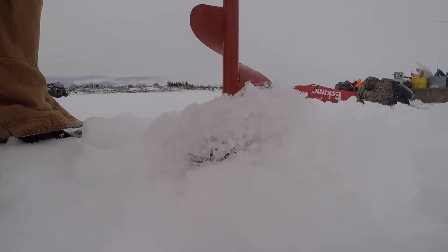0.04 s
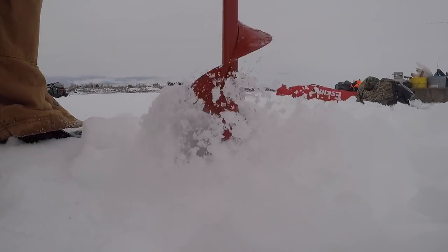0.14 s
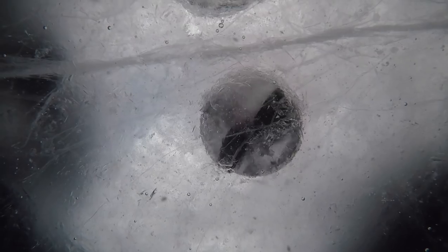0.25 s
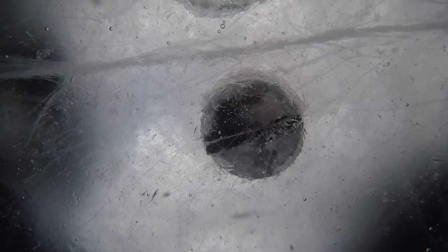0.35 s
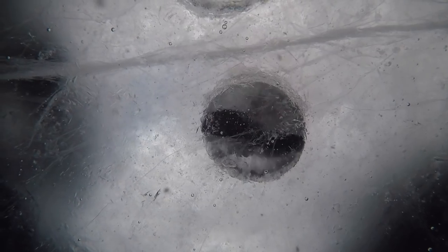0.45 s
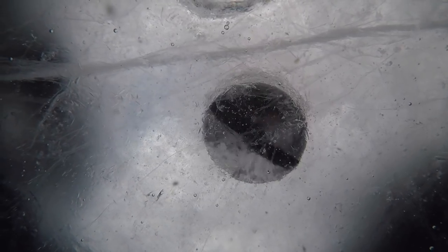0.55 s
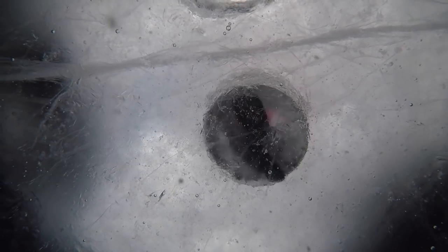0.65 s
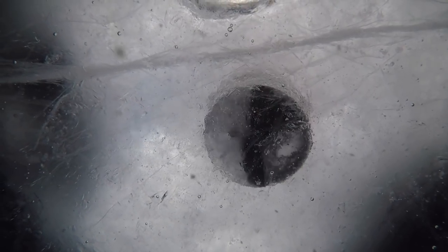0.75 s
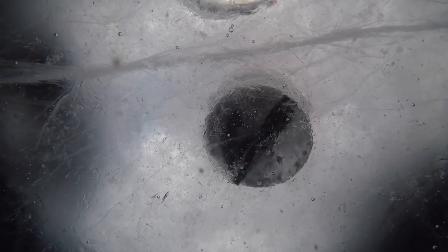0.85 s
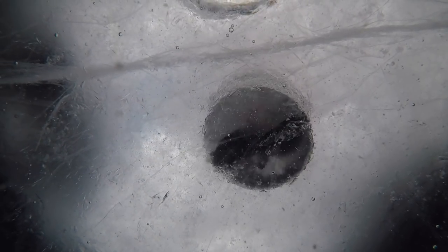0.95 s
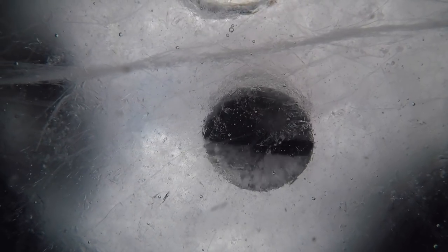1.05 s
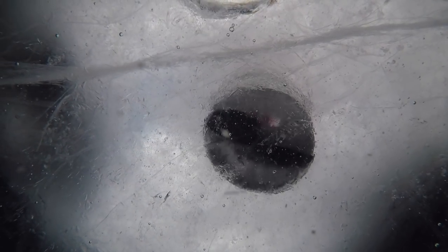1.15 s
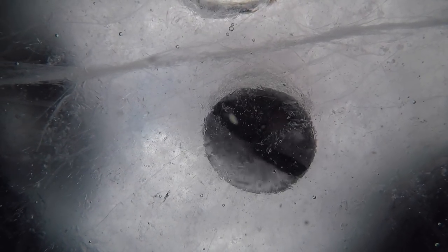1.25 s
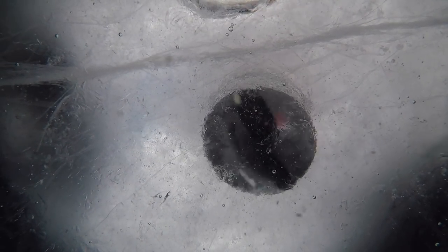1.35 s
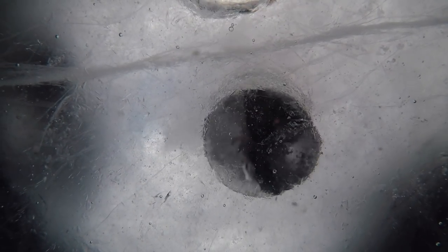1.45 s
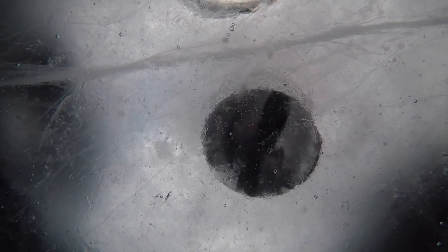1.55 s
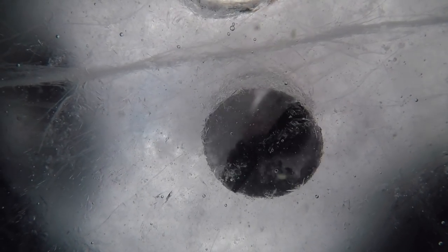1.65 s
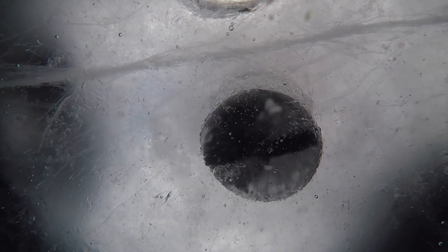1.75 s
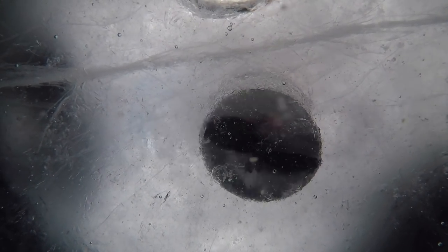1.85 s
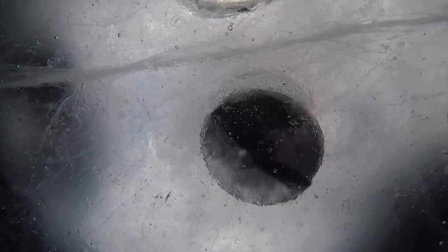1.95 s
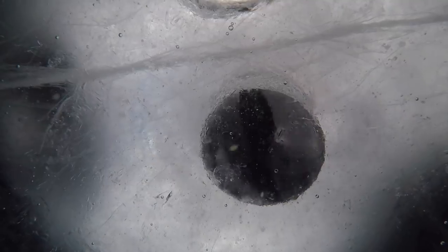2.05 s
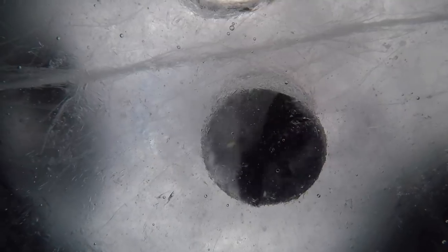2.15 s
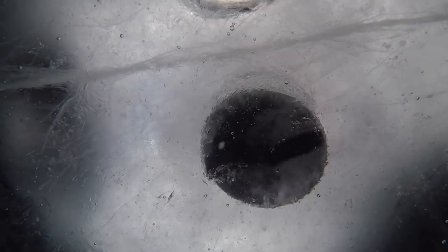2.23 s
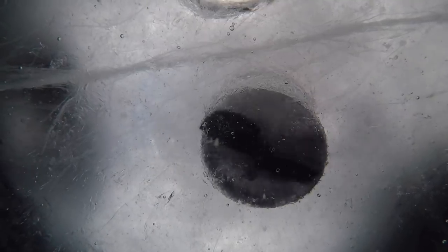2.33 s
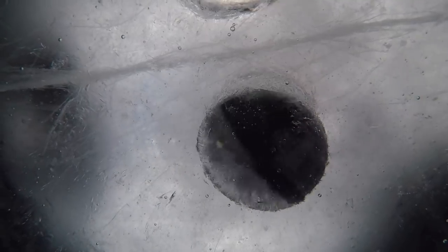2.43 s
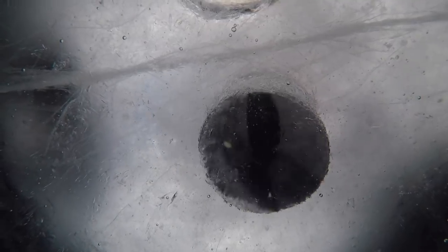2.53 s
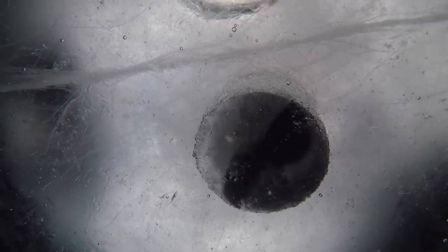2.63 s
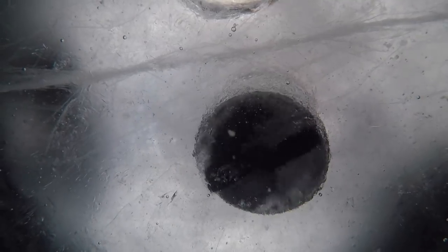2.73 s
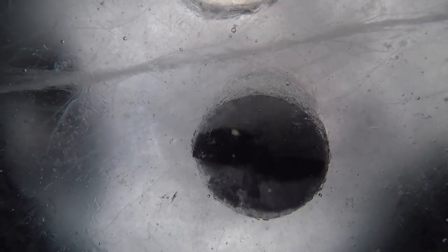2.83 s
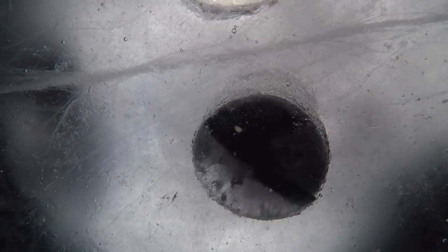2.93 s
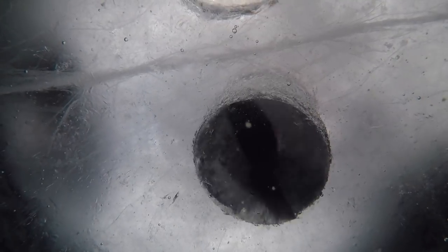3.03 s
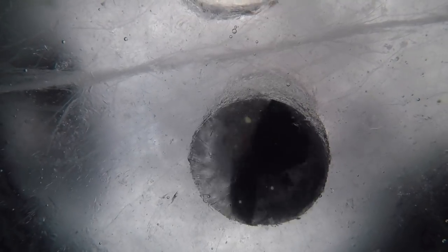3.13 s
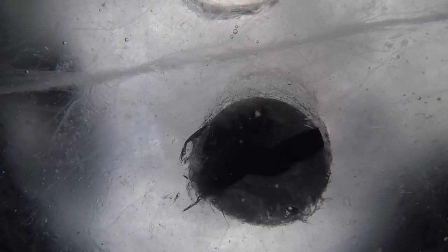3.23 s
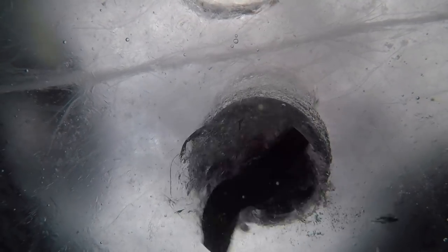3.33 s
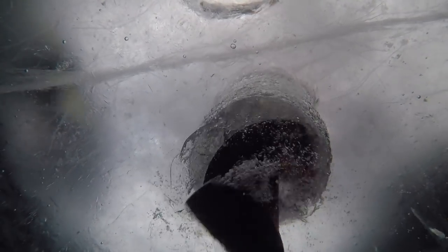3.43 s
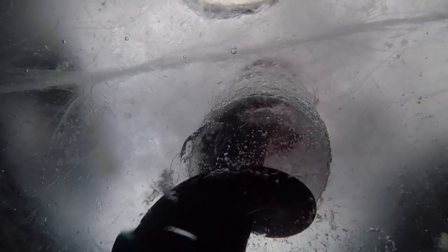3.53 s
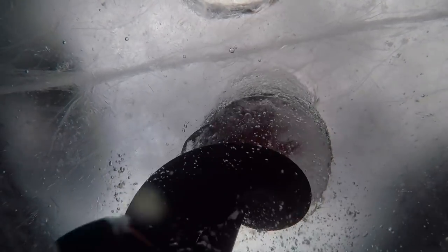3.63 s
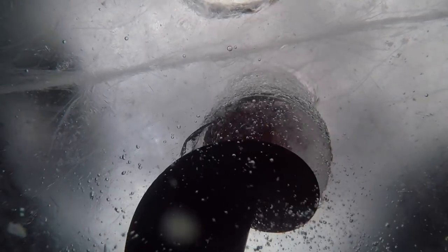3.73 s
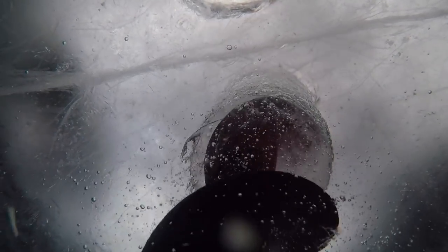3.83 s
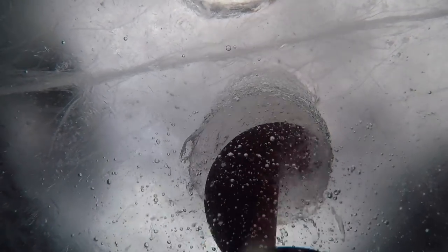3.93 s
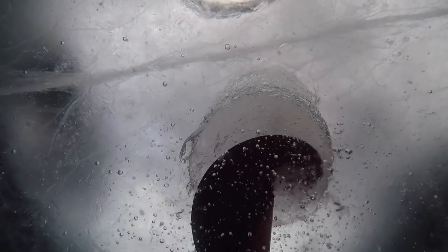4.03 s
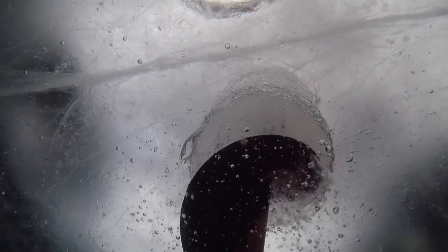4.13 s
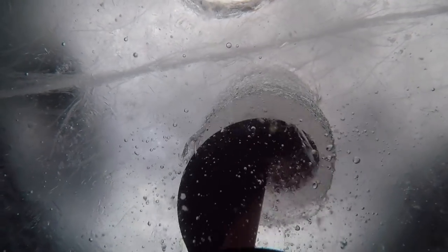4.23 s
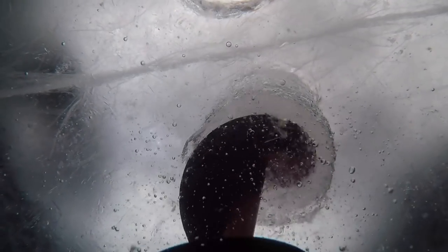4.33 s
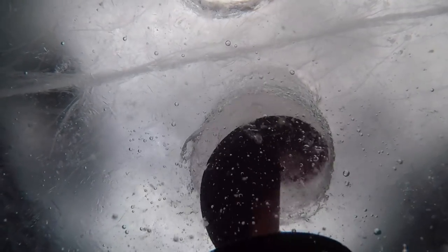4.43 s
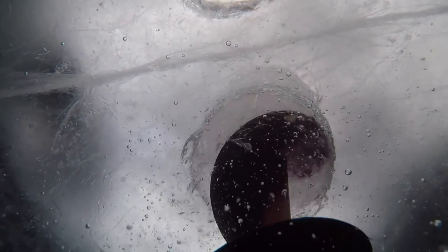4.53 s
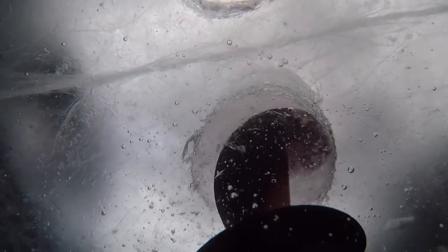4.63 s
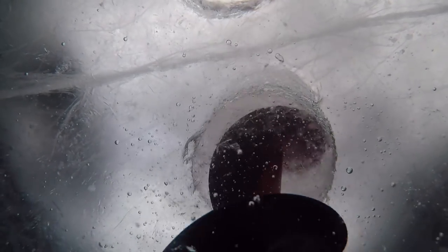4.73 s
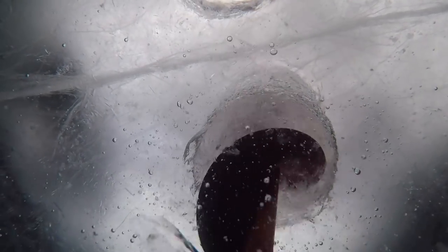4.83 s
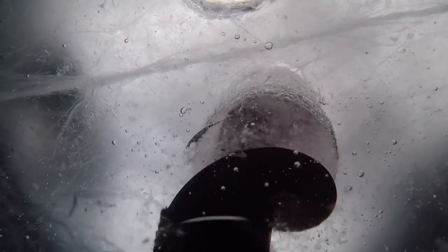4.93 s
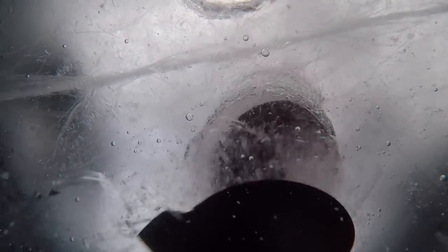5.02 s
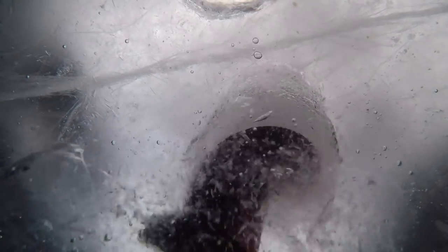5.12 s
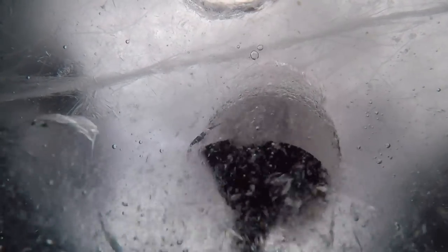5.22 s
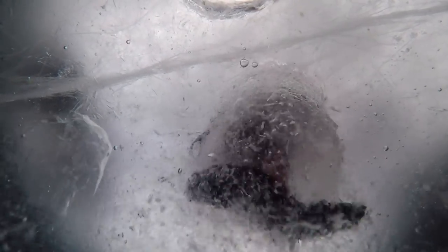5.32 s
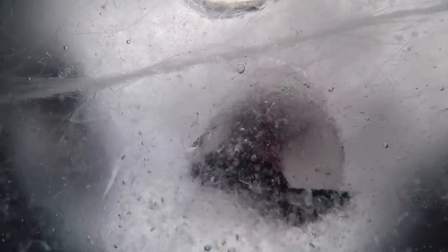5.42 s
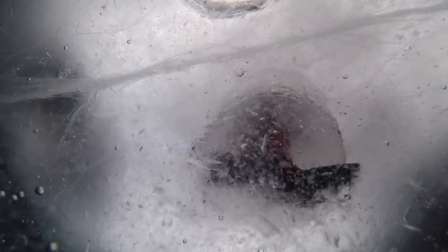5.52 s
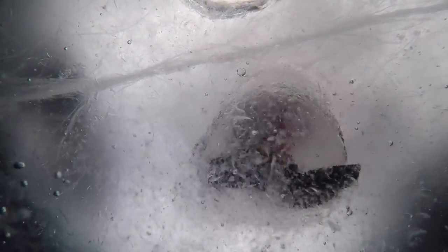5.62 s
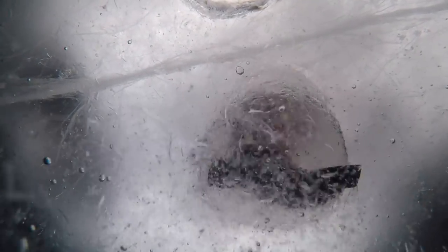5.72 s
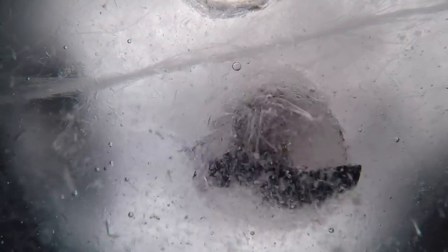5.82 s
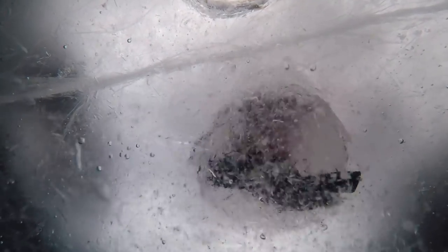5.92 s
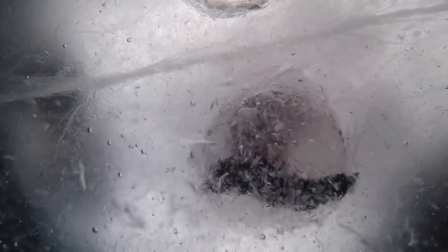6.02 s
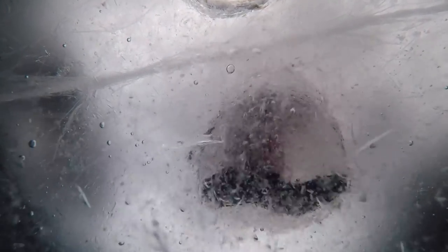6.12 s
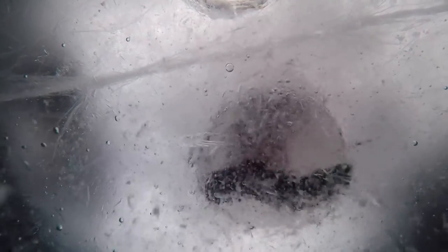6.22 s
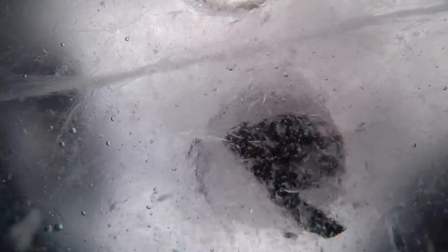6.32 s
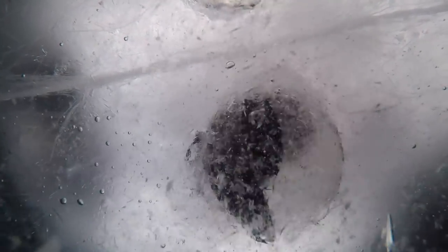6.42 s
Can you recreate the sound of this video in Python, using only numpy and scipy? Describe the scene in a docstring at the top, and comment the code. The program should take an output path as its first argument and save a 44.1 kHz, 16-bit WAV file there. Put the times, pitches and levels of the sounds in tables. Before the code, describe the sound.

A split second of bright scraping hiss in open air, then dull muffled underwater grinding through ice, breaking through into knocks, rubs, gurgles and churning slush.

```python
"""Ice auger, above and below the ice

A split second of bright hiss in open air, then the cut heard in the water: filtered random fractures
give a dull rumble, crunch, ringing ice and a growing fizz. After the break-through the spiral rubs,
knocks and judders in the hole (fracture bursts, decaying and wavering sines), chips and slush churn,
ice snaps and bubbles ring, all through a waterproof case with two unlike microphones.
"""
import sys
import numpy as np
from scipy import signal
from scipy.fft import rfft, irfft
from scipy.io import wavfile
from scipy.ndimage import uniform_filter1d

SR = 44100
rng = np.random.default_rng(int(sys.argv[2]) if len(sys.argv) > 2 else 0)


def persist_wave(psi):
    """Save psi, clipped to +-1, as 16-bit WAV."""
    counts = np.round(np.clip(psi, -1, 1) * 32767).astype(np.int16)
    wavfile.write(sys.argv[1], SR, np.atleast_2d(counts).T)


N = 285184
TIME = np.arange(N) / SR
HZ = np.fft.rfftfreq(8192, 1 / SR)

DIVE_S, THROUGH_S = 0.215, 3.228  # the ear goes under the ice; the blades break through
EDGE_HZ = 12800

# blades in open air: hz, relative_db_per_hz
AIR_SPECTRUM = [(5, -61.5), (30, -23), (85, -31), (160, -3), (260, -8.5), (520, -15.5), (1050, -12.5),
                (1600, -11.5), (2400, -17.5), (3100, -12), (4700, -16.5), (6200, -11.5), (8200, -22.5),
                (9300, -19.5), (10100, -25), (10600, -76)]
# ringing of the auger's steel: hz, relative_db
STEEL_MODES = [(1244, -44), (1604, -47), (1776, -41.5), (2998, -49.5), (3822, -46.5), (5163, -56.5),
               (6072, -47), (6331, -49.5), (6751, -51.5), (6993, -47.5), (7192, -46.5), (9275, -58)]
AIR_DB = -27

# dull grinding through the ice: hz, relative_db_per_hz
RUMBLE_SPECTRUM = [(4, -48), (25, -12.5), (60, -10), (100, -1), (150, 3), (240, -1), (290, -7.5), (340, -4),
                   (410, -9.5), (550, -5), (670, -14), (770, -15), (900, -21.5), (1500, -59)]
# ice crushed by the blades: hz, relative_db_per_hz
CRUNCH_SPECTRUM = [(600, -35), (950, -18.5), (1050, -8), (1280, 0.5), (1430, -14), (1650, -12.5),
                   (2150, -23.5), (2600, -28.5), (3100, -30.5), (3600, -31), (4200, -36), (6000, -48)]
# fine, bright fractures: hz, relative_db_per_hz
FIZZ_SPECTRUM = [(2800, -52), (4300, -24.5), (5000, -11), (6000, -1.5), (6700, -6), (7300, -1),
                 (7900, -13.5), (8400, -8), (9500, -22), (10500, -20), (11200, -35), (12200, -26),
                 (14500, -76)]
# thick ice, ringing in surges: hz, width_hz, median_level_db
THICK_MODES = [(1286, 73, -53.5), (1544, 90, -65)]
# last thin sheet: hz at SHEET_GIVES_S, width_hz, median_level_db at the peak of its swell
SHEET_MODES = [(880, 160, -48.5), (1122, 83, -50.5), (1820, 490, -55), (2175, 200, -54.5)]
SINK_OCTAVES_PER_S = 0.23  # sheet pitch sinks within 1 s of SHEET_GIVES_S
RUMBLE_DB = -29
THICK_RING_HZ, THICK_RING_WIDTH_HZ, THICK_RING_DB = 638, 350, 6  # in the rumble, fades with depth
CRUNCH_DB, SHEET_SWELL_DB, SHEET_GIVES_S, SHEET_SWELL_S = -54, 6.5, 3.03, 0.3
FIZZ_START_DB, FIZZ_DB_PER_S, FIZZ_END_S = -64, 2.5, 0.047
# passing blades slip: period, one slip moment, dip at full depth, width as a share of the period
BLADE_S, BLADE_SLIP_AT_S, BLADE_SLIP_DB, BLADE_SLIP_SHARE = 0.253, 2.295, -13, 0.15

# auger judders on the wall: start_s, length_s, pitch_hz, level_db, waver_share_of_pitch
JUDDER_EVENTS = [(0.598, 0.13, 37, -36, .17), (3.524, 0.071, 140, -36, 0.28),
                 (4.246, 0.18, 535, -38, 0.053), (4.838, 0.054, 346, -30, 0.056),
                 (4.885, 0.05, 155, -32.5, 0.18), (5.024, 0.056, 174, -29, 0.15)]
JUDDER_UNEVEN_DB = 1.5

# spiral rubs and crushes chips:
# start_s, length_s, relative_rub_db, ice_ring_hz, relative_chips_db, chip_ring_hz
STROKE_EVENTS = [(3.178, 0.031, -37, 577, -55, 1400), (3.211, 0.015, -33.5, 568, -54, 1180),
                 (3.277, .028, -39.5, 321, -61.5, 1480), (3.364, 0.051, -36, 433, -48, 1290),
                 (3.451, 0.021, -35.5, 600, -61, 1120), (3.589, .032, -43, 612, -63.5, 1200),
                 (3.793, .022, -37, 365, -50.5, 1780), (3.854, 0.041, -42, 320, -53.5, 1430),
                 (4.187, 0.051, -49.5, 585, -61, 1860), (4.24, 0.043, -37, 523, -50.5, 1810),
                 (4.303, 0.09, -38.5, 516, -60.5, 1830), (4.443, 0.023, -34.5, 322, -60, 1600),
                 (4.535, 0.071, -42.5, 558, -67, 1630), (4.68, 0.027, -37.5, 304, -63, 1150),
                 (4.727, 0.037, -31, 278, -44.5, 1250), (4.784, 0.02, -31.5, 310, -53.5, 1820),
                 (4.822, 0.059, -38.5, 510, -60, 1840), (4.89, 0.026, -31, 318, -57.5, 1790),
                 (4.968, 0.041, -39, 604, -56, 1400), (5.033, 0.065, -35.5, 454, -61, 1460),
                 (5.122, 0.041, -34.5, 338, -63.5, 1400), (5.199, 0.035, -38, 426, -56, 1090),
                 (5.268, 0.029, -37.5, 500, -71, 940), (5.42, 0.024, -31, 457, -57, 1080),
                 (5.476, 0.029, -33, 567, -60.5, 1050), (5.786, 0.08, -50, 615, -76.5, 1390),
                 (5.901, 0.017, -38.5, 487, -62.5, 1140), (5.981, 0.039, -44.5, 241, -73, 1000),
                 (6.091, 0.011, -40.5, 325, -61, 1020), (6.108, 0.067, -35.5, 622, -58, 940),
                 (6.208, 0.025, -32.5, 500, -48.5, 1150), (6.241, 0.049, -34, 612, -56.5, 1340),
                 (6.301, 0.081, -42, 612, -62, 1110), (6.418, 0.032, -38, 597, -56.5, 1090)]
# water shoved by a stroke: time_s, push_db relative to the rub column
PLUNGE_CURVE = [(3.28, 3.5), (3.79, 6), (3.94, -25), (4.24, -5), (4.73, 0.5), (5.15, -12), (5.28, -2.5),
                (6.21, 3)]
# ice rubbed by the spiral: hz, relative_db_per_hz
BODY_SPECTRUM = [(60, -41.5), (170, -3.5), (240, -1), (315, 1), (400, -2.5), (510, 4.5), (600, 1.5),
                 (680, -2), (770, -1), (950, -9), (1100, -34), (1900, -52)]
# shoved water: hz, relative_db_per_hz
PUSH_SPECTRUM = [(8, -23.5), (25, 4.5), (42, 0), (80, -0.5), (140, -5.5), (190, -13.5), (300, -32),
                 (600, -72.5)]
# breaking chips: hz, relative_db_per_hz
CHIP_SPECTRUM = [(600, -36), (950, -2.5), (1200, -5.5), (1420, -14.5), (1800, -19), (2050, -25),
                 (2650, -29), (3100, -33.5), (3550, -34.5), (4000, -36.5), (5000, -41.5), (6200, -36.5),
                 (7200, -35), (8400, -45.5), (10500, -58), (15000, -100.5)]
# ringing of the case: hz, width_hz, peak_db
CASE_MODES = [(1127, 76, 4.5), (1807, 160, 6), (2880, 130, 5)]
CHIP_RING_DB, BRIGHTER_DB = 8.5, 12.5  # higher-ringing chips crunch brighter
SOFTEN_FROM_S, SOFTEN_S, SOFTEN_DB_PER_OCTAVE = 5, 0.15, -7.5  # chips turn to slush: duller
LARGE_BUBBLE_HZ, BUBBLE_OCTAVES, BUBBLE_T60_S, BUBBLE_RISE_SHARE = 476, 1.1, 0.058, 0.24

# spiral bumps the wall: start_s, pitch_hz, relative_db
KNOCK_EVENTS = [(3.219, 580, -26.5), (3.465, 581, -21), (3.506, 611, -21.5), (3.899, 513, -22),
                (3.943, 589, -24.5), (3.972, 573, -26), (4.051, 551, -21), (4.447, 613, -26.5),
                (4.796, 537, -28), (4.894, 607, -21), (5.269, 503, -30.5), (5.426, 474, -29.5),
                (5.49, 550, -27.5), (6.112, 622, -24), (6.391, 570, -23)]
KNOCK_T60_S, KNOCK_RISE_S, KNOCK_SCUFF_DB = 0.055, .003, -15

# stirring of the water: time_s, stir_db
CHURN_CURVE = [(3.24, -37.5), (3.55, -43), (3.7, -46.5), (4.0, -43.5), (4.15, -53.5), (4.38, -48.5),
               (4.64, -41.5), (4.87, -40), (4.95, -43.5), (5.06, -38), (5.35, -39.5), (5.53, -62),
               (6.06, -52), (6.31, -37.5), (6.46, -38)]
# crackle of the chips: time_s, db relative to stir
CRISP_CURVE = [(3.3, -21.5), (3.5, -31), (4.5, -19), (4.62, -20), (4.87, -16.5), (4.94, -34), (5.06, -22.5),
               (5.3, -30.5), (6.3, -23.5)]
SLUSH_DB, SWIRL_DB, SWIRL_EXPONENT = -4, -22, 0.58  # swirl dies down less than the chips it carries

# ice snaps off the rim: start_s, relative_db
SNAP_EVENTS = [(3.2595, -50), (3.3667, -46), (3.467, -52), (3.508, -65), (3.597, -64), (3.7955, -64),
               (4.128, -53.5), (4.2415, -40), (4.4476, -54), (4.538, -58), (4.555, -52), (4.7304, -40.5),
               (4.8447, -49), (4.8916, -44), (4.9719, -60), (5.911, -60.5), (6.0943, -63), (6.128, -60),
               (6.2175, -52), (6.2784, -52), (6.3602, -58), (6.442, -56)]
# lone bubbles: start_s, pitch_hz, relative_db
BUBBLE_EVENTS = [(5.708, 3530, -65.5), (5.723, 1820, -64)]

# microphones in the case: hz, left_minus_right_db
CASE_BALANCE = [(60, -1.1), (170, -2), (250, -5), (340, -9), (430, -14.5), (600, -16), (660, -8), (730, -6),
                (950, -4.5), (1150, -3.5), (1420, -4.5), (1780, 4), (2250, -8), (2980, 3.5), (3500, -3),
                (4200, 1.5), (6000, -5.5), (6900, 6.5), (8300, -8), (9500, 5)]
# phase between the microphones: hz, left_lead_rad
LEFT_LEAD = [(30, 0), (300, -.7), (400, -1.25), (500, -2.4), (550, -3.5), (660, -7.3), (760, -9.3),
             (1150, -8.6), (1420, -10.1), (1680, -16.5), (2200, -18.7), (2650, -16.5), (2950, -13.5),
             (4250, -9.4), (5000, -11.4), (6000, -16.9), (7200, -17.5), (8400, -18.9)]
# microphones in open air: hz, left_minus_right_db
OPEN_AIR_BALANCE = [(60, -9), (110, -1.5), (180, -1), (320, -10.5), (570, -1.5), (1000, 2), (1760, -6.5),
                    (3090, 8.5), (5420, -1.5), (9510, 7)]


def amp(db):
    """Decibels to gain."""
    return 10 ** (np.asarray(db) / 20)


def evened(x):
    """Scale so that the mean of the channels has rms 1."""
    return x / np.sqrt(np.mean(np.atleast_2d(x).mean(0) ** 2) + 1e-20)


def read(points):
    """Table over frequency, joined on a log axis."""
    hz, value = np.transpose(points)
    return np.interp(np.log(HZ + 1), np.log(hz + 1), value)


def level(points):
    """Gain over time from a time_s, db table."""
    time_s, db = np.transpose(points)
    return amp(np.interp(TIME, time_s, db))


def add(mix, start_s, sound):
    """Mix a sound in at start_s."""
    part = mix[..., max(round(start_s * SR), 0):][..., :sound.shape[-1]]
    part += sound[..., :part.shape[-1]]


def wander(rate_hz):
    """Slow random curve of rms 1."""
    spectrum = rfft(rng.standard_normal(N))
    lowpass = 1 + (np.fft.rfftfreq(N, 1 / SR) / rate_hz) ** 2
    return evened(irfft(spectrum / lowpass, N))


def cracks(per_s, spread_db, size=N):
    """Tiny fractures at random moments, a few much larger than the rest."""
    chance, weight, sign = rng.random((3, size))
    height = amp(spread_db * np.minimum(-np.log(1 - weight), 4))
    return evened((chance < per_s / SR) * height * np.sign(sign - .5))


def colour(x, db):
    """Minimum-phase filter: every crack rings after it lands."""
    log_gain = np.log(amp(np.maximum(db - db.max(), -100)))
    circle = np.r_[log_gain, log_gain[-2:0:-1]]
    response = np.exp(np.conj(signal.hilbert(circle)))[:len(HZ)]
    taps = irfft(response)[:4096]
    return signal.oaconvolve(x, taps)[:len(x)]


def shape(points):
    """Spectrum in dB that keeps falling beyond its last point."""
    return read(points) - 40 * np.log2(np.maximum(HZ / points[-1][0], 1))


def resonances(hz, width_hz, db):
    """Boost in dB from a set of resonant peaks."""
    hz, width_hz, db = (np.reshape(column, (-1, 1)) for column in (hz, width_hz, db))
    power = amp(db) ** 2 / (1 + (2 * (HZ - hz) / width_hz) ** 2)
    return 10 * np.log10(1 + power.sum(0))


def resonate(x, hz, width_hz):
    """Steep resonance that can follow a moving pitch."""
    turn = np.exp(2j * np.pi * np.cumsum(hz * np.ones(N)) / SR)
    r = np.exp(-np.pi * width_hz / SR)
    return evened((turn * signal.lfilter([1], [1, -2 * r, r * r], x / turn)).real)


def ports(x, balance=CASE_BALANCE):
    """Two microphones that differ in level and phase over frequency."""
    half = amp(read(balance) / 2)
    pair = np.array([half * np.exp(1j * read(LEFT_LEAD)), 1 / half])
    pair /= np.sqrt((half ** 2 + half ** -2) / 2)
    taps = np.roll(irfft(pair), 4096, axis=1)  # centred, delay removed below
    return signal.oaconvolve(x[None], taps, axes=1)[:, 4096:4096 + len(x)]


def scatter(x, t60_s, wet_db):
    """Short dense echoes in the ice and the steel, different at each microphone."""
    t = TIME[:6000]
    tail = rng.standard_normal((2, len(t))) * amp(-60 * t / t60_s)
    tail /= np.linalg.norm(tail, axis=1, keepdims=True)
    return x + amp(wet_db) * signal.oaconvolve(x, tail, axes=1)[:, :x.shape[1]]


def chip_colour():
    """Spectrum of breaking ice as it rings in the case."""
    return shape(CHIP_SPECTRUM) + resonances(*np.transpose(CASE_MODES))


def rub(length_s, spectrum, per_s, spread_db, fade_db, attack_s):
    """One catch and slide: a burst of fractures that builds, changes level by -fade_db and rings out."""
    t = TIME[:max(round(length_s * SR), 64)]
    envelope = amp(-fade_db * t / t[-1]) * (1 - np.exp(-t / attack_s))
    burst = cracks(per_s, spread_db, size=len(t)) * envelope
    sound = ports(colour(np.r_[burst, np.zeros(5000)], spectrum))
    sound = sound * (1 - np.exp(-(TIME[:sound.shape[1]] / .0012) ** 2))  # soft onset
    return sound * np.sqrt(len(t) / (np.sum(sound.mean(0) ** 2) + 1e-20))


def bubble(hz, t60_s, rise_share):
    """An air pocket rings, decays and climbs in pitch until t60_s as it frees itself."""
    t = TIME[:4000]
    turns = hz * t * (1 + rise_share * np.minimum(t / t60_s, 1) / 2)
    return amp(-60 * t / t60_s) * (1 - np.exp(-t / 0.002)) * np.sin(2 * np.pi * turns)


def open_air():
    """Blades shave the surface: a bright hiss of fractures that sets the steel ringing."""
    size = SR // 4
    hz, db = np.transpose(STEEL_MODES)
    spectrum = shape(AIR_SPECTRUM) + resonances(hz, 55, db - db.max() + 12.0)
    flutter = amp(.7 * wander(70)[:size])

    def hiss():
        return ports(colour(cracks(9000, 1.8, size=size) * flutter, spectrum), OPEN_AIR_BALANCE)

    near, apart = hiss(), hiss()
    highpass = signal.butter(2, 1500, "high", fs=SR, output="sos")
    apart = signal.sosfilt(highpass, apart) * [[1], [-1]]  # one channel inverted: wide treble
    out = np.zeros((2, N))
    add(out, 0, amp(AIR_DB) * evened(near + 0.5 * apart))
    return out


def grinding():
    """Blades chatter through solid ice; one uneven bite drives rumble, crunch, ringing ice and fizz."""
    bite = wander(18)
    surge = wander(4.4)  # harder and softer ice as the blades turn
    depth = np.minimum(TIME / THROUGH_S, 1)
    to_end_s = np.minimum(TIME - THROUGH_S, 0)
    giving = np.exp(-((TIME - SHEET_GIVES_S) / SHEET_SWELL_S) ** 2)

    slips = cracks(2500, 1.85)
    thick_ring = resonances(THICK_RING_HZ, THICK_RING_WIDTH_HZ, THICK_RING_DB)
    ringing = evened(colour(slips, shape(RUMBLE_SPECTRUM) + thick_ring))
    plain = evened(colour(slips, shape(RUMBLE_SPECTRUM)))
    chatter = evened((1 - depth) * ringing + depth * plain)
    # ice gives way at a steady force, which evens the chatter
    force = np.sqrt(uniform_filter1d(chatter ** 2, SR // 60) + .2)
    rumble = ports(chatter / force * amp(1.48 * bite))
    grip = amp(-7 * np.exp(to_end_s / 0.051))  # blades lose their grip at the end

    fractures = cracks(2200, 2.0) * amp(1.1 * bite + 0.41 * wander(60))
    crunch = ports(colour(fractures, shape(CRUNCH_SPECTRUM)))
    crunch_gain = amp(CRUNCH_DB + SHEET_SWELL_DB * giving)

    thick = sum(amp(db + 3.0 * wander(5.3)) * resonate(fractures, hz, width_hz)
                for hz, width_hz, db in THICK_MODES)
    thinning = 2 ** (SINK_OCTAVES_PER_S * np.clip(SHEET_GIVES_S - TIME, -1, 1))
    sheet = sum(amp(db + 4.4 * wander(10)) * resonate(fractures, hz * thinning, width_hz)
                for hz, width_hz, db in SHEET_MODES)

    blade = ((TIME - BLADE_SLIP_AT_S) / BLADE_S + .5) % 1 - .5  # periods from the nearest slip
    slip_db = BLADE_SLIP_DB * depth * np.exp(-(blade / BLADE_SLIP_SHARE) ** 2)
    fine = cracks(7000, 3.5) * amp(1.0 * bite + 1.0 * surge + slip_db)
    fizz = ports(colour(fine, shape(FIZZ_SPECTRUM)))
    ice_left = 1 - np.exp(to_end_s / FIZZ_END_S)
    fizz_gain = amp(FIZZ_START_DB + FIZZ_DB_PER_S * TIME) * ice_left

    return (amp(RUMBLE_DB) * grip * evened(rumble) + ports(thick + giving * sheet)
            + crunch_gain * evened(scatter(crunch, 0.083, wet_db=-8.5))
            + fizz_gain * evened(scatter(fizz, 0.03, wet_db=-2.5)))


def judders():
    """Stick and slip: a short uneven groan or squeak that swells and dies."""
    out = np.zeros(N)
    sway = wander(35)
    grip = amp(JUDDER_UNEVEN_DB * wander(70))
    for start_s, length_s, hz, db, waver in JUDDER_EVENTS:
        size, start = round(length_s * SR), round(start_s * SR)
        turns = np.cumsum(hz * (1 + waver * sway[start:][:size])) / SR
        groan = evened(grip[start:][:size] * np.sin(2 * np.pi * turns))
        add(out, start_s, amp(db) * signal.windows.tukey(size, .5) * groan)
    return ports(out)


def softness(s):
    """How far the chips have turned to slush, 0-1."""
    return np.clip((s - SOFTEN_FROM_S) / SOFTEN_S, 0, 1)


def strokes():
    """Each rub of the spiral rings the ice, shoves water against the case and crushes chips."""
    body, push, chips = np.zeros((3, 2, N))
    for s, length_s, db, ring_hz, chips_db, chip_hz in STROKE_EVENTS:
        ring = resonances(ring_hz, 40, 11.3)
        add(body, s, amp(db) * rub(length_s, shape(BODY_SPECTRUM) + ring, 1300, 2.45,
                                   fade_db=2.5, attack_s=0.00027))

        push_db = db + np.interp(s, *np.transpose(PLUNGE_CURVE))
        add(push, s - .002, amp(push_db) * rub(length_s, shape(PUSH_SPECTRUM), 1500, 2.3,
                                               fade_db=-3.0, attack_s=0.00057))

        shard_hz = 1000 * 3.0 ** rng.random(size=5)  # every shard has its own pitch
        shards = resonances(shard_hz, .03 * shard_hz, 6)
        shards = shards + resonances(chip_hz, .09 * chip_hz, CHIP_RING_DB)
        harder = BRIGHTER_DB * np.log2(chip_hz / 1200) * np.log2(np.clip(HZ / 1000, 1, 2))
        duller = SOFTEN_DB_PER_OCTAVE * softness(s) * np.log2(np.clip(HZ / 1150, 1, 2))
        spectrum = chip_colour() + shards + harder + duller
        add(chips, s, amp(chips_db) * rub(length_s, spectrum, 1500, 3.0, fade_db=7, attack_s=0.0031))
    body = amp(0.64) * scatter(body, 0.09, wet_db=-8)
    return body + amp(0.8) * push + scatter(chips, 0.14, wet_db=-9)


def gurgle():
    """Strokes shake bubbles loose: large ones follow the force of the rub, small ones the crushing."""
    out = np.zeros(N)
    for s, length_s, db, _, chips_db, _ in STROKE_EVENTS:
        for when, small, faint in rng.random((5, 3)):
            hz = LARGE_BUBBLE_HZ * 2 ** (BUBBLE_OCTAVES * small)
            t60_s = BUBBLE_T60_S * (LARGE_BUBBLE_HZ / hz) ** .5
            loud_db = np.interp(small, [0, 1], [db - 0.5, chips_db + 4]) - 8 * faint
            add(out, s + when * length_s, amp(loud_db) * bubble(hz, t60_s, BUBBLE_RISE_SHARE))
    return amp(-2.0) * ports(out)


def knocks():
    """Each bump is a hollow plop, a decaying sine, with a brief scuff of fractures."""
    plops, scuffs = np.zeros(N), np.zeros((2, N))
    t = TIME[:SR // 8]
    spectrum = np.maximum(shape(BODY_SPECTRUM), chip_colour() - 14)
    for s, hz, db in KNOCK_EVENTS:
        envelope = amp(db - 60 * t / KNOCK_T60_S) * (1 - np.exp(-(t / KNOCK_RISE_S) ** 2))
        add(plops, s, envelope * np.sin(2 * np.pi * hz * t))
        scuff = rub(0.012, spectrum, 4000, 1.7, fade_db=10.5, attack_s=0.00091)
        add(scuffs, s, amp(db + KNOCK_SCUFF_DB) * scuff)
    return ports(plops) + scuffs


def slush():
    """Loose chips tumble and crackle in a swirl of water noise below the open hole."""
    tumble = cracks(1500, 3.5) * amp(3.4 * wander(27))
    body = evened(ports(colour(tumble, shape(BODY_SPECTRUM))))
    chips = evened(scatter(ports(colour(tumble, chip_colour())), 0.1, wet_db=-7.5))
    swirl = evened(ports(colour(rng.standard_normal(N), shape(PUSH_SPECTRUM))))
    stir = level(CHURN_CURVE)
    carried = stir * (amp(SLUSH_DB) * body + level(CRISP_CURVE) * chips)
    return carried + amp(SWIRL_DB) * stir ** SWIRL_EXPONENT * swirl


def snaps():
    """A shard breaks off in a few milliseconds with a bright tick."""
    out = np.zeros((2, N))
    spectrum = chip_colour() + 4 * np.log2(np.clip(HZ / 2000, .5, 4))
    for s, db in SNAP_EVENTS:
        add(out, s, amp(db) * rub(0.0046, spectrum, 14000, 1.5, fade_db=6, attack_s=.001))
    return amp(-6.5) * scatter(out, 0.046, wet_db=-6.5)


def bubbles():
    """Small bubbles ring alone while the auger rests."""
    out = np.zeros(N)
    for s, hz, db in BUBBLE_EVENTS:
        add(out, s, amp(db) * bubble(hz, t60_s=0.036, rise_share=.02))
    return ports(out)


def scene():
    """Open air, then under the ice: grinding until the break-through, churning after it."""
    under = np.clip((TIME - DIVE_S) / 0.0024 + .5, 0, 1)
    through = np.clip((TIME - THROUGH_S) / 0.0061 + .5, 0, 1)
    hiss = amp(-90) * rng.standard_normal((2, N))
    water = (1 - through) * grinding() + through * slush()
    water = water + judders() + strokes() + gurgle() + knocks() + snaps() + bubbles()
    return (1 - under) * open_air() + under * water + hiss


def record(dry):
    """Steep low-pass at EDGE_HZ."""
    taps = signal.firwin(511, EDGE_HZ, window=("kaiser", 9), fs=SR)
    return signal.oaconvolve(dry, taps[None], "same")


dry = scene()
out = record(dry)
persist_wave(out)
```